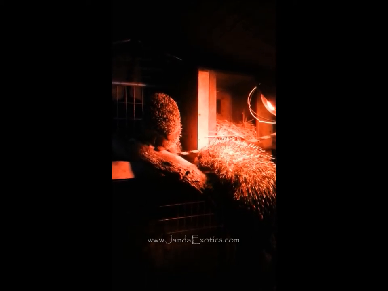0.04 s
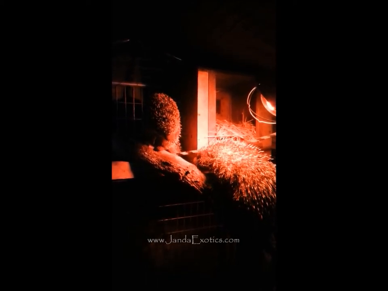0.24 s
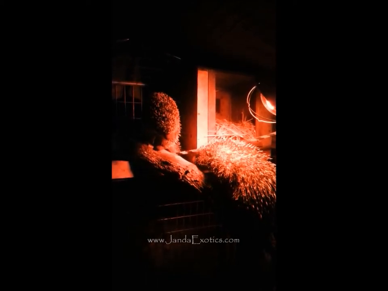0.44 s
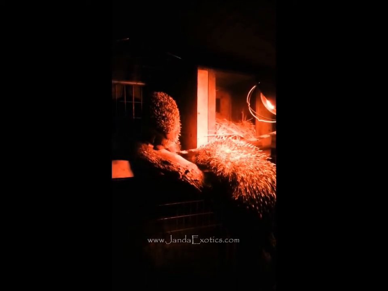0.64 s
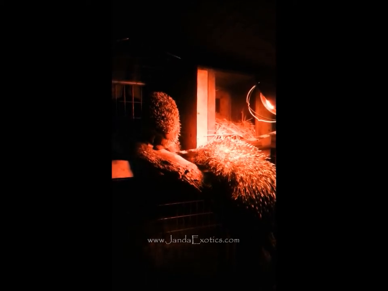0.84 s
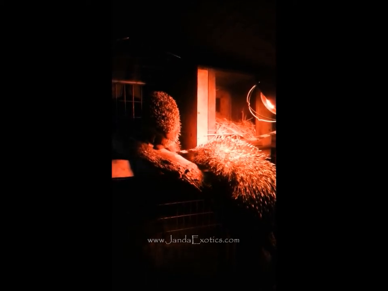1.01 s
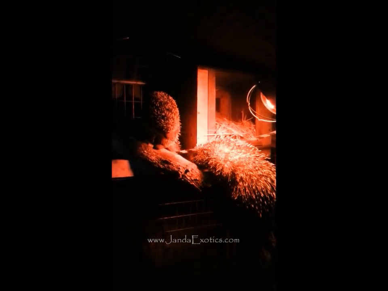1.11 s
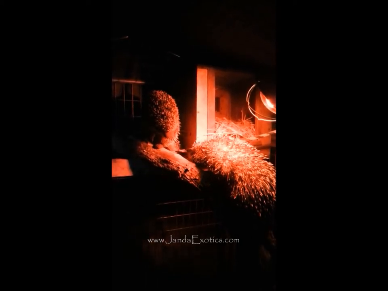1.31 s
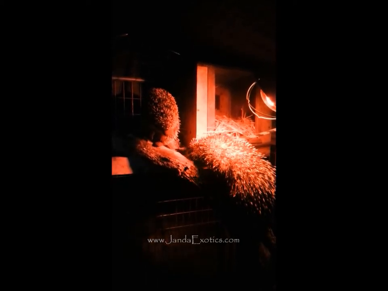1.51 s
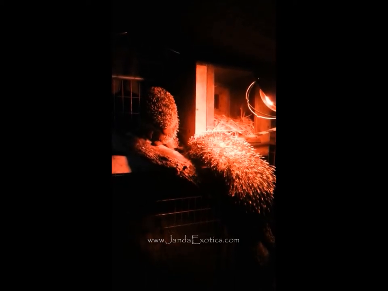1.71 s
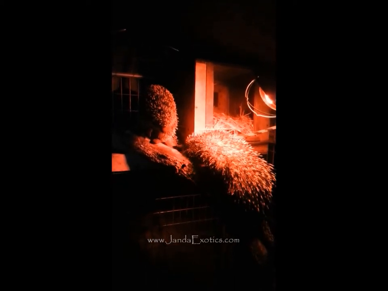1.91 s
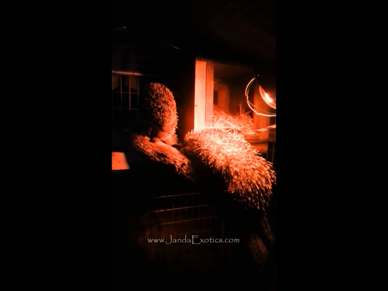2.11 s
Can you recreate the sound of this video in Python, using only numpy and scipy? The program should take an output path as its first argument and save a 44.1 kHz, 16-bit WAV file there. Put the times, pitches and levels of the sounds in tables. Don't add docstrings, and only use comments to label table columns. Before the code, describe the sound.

Harsh porcupine grunts and breathy huffs, small quill rustles, then one raspy cry and low growl.

```python
import sys
import numpy as np
from scipy import signal
from scipy.fft import rfft, irfft, next_fast_len
from scipy.io import wavfile
from scipy.ndimage import uniform_filter1d, minimum_filter1d

SR = 44100
rng = np.random.default_rng(int(sys.argv[2]) if len(sys.argv) > 2 else 0)


def master_out(mix):
    frames = np.transpose(np.atleast_2d(mix))
    ceiling = np.clip(frames, -1, 1)
    pcm = np.round(ceiling * 32767).astype(np.int16)
    wavfile.write(sys.argv[1], SR, pcm)


def invert_db(x):
    u = np.asarray(x, float) / 20
    return 10 ** u


N = 94815

GATE_RANGE_DB = 18.5


def rms_one(x):
    return x / np.sqrt(np.mean(x ** 2) + 1e-20)


def at_hz(points, hz):
    points = np.array(points)
    return np.interp(np.log(hz + 1), np.log(points[:, 0]), points[:, 1])


def drift(rate_hz, count):
    r = np.exp(-2 * np.pi * rate_hz / SR)
    settle = 9000
    noise = rng.standard_normal(count + settle)
    return rms_one(signal.lfilter([1], [1, -2 * r, r * r], noise)[settle:])


def resonate(x, hz, width_hz):
    r = np.exp(-np.pi * width_hz / SR)
    feedback = [1, -2 * r * np.cos(2 * np.pi * hz / SR), r * r]
    return signal.lfilter(np.array([1, 0, -1]) * (1 - r * r) / 2, feedback, x)


def tract(x, peaks):
    out = 0
    for k, (hz, width_hz, db) in enumerate(peaks):
        steep = resonate(resonate(x, hz, width_hz), hz, 2 * width_hz)
        out = out + (-1) ** k * invert_db(db) * steep
    return out


def background():
    # frequency in Hz, level in dB per Hz
    floor_spectrum = [(15, -54), (25, -16), (128, -6), (790, -19.5), (879, -30.5), (1240, -21.5),
                      (3350, -25.5), (13800, -26.5), (15000, -34)]
    # frequency in Hz, likeness 0-1
    likeness = [(60, 0.97), (380, 0.65), (2370, 0.1), (14800, 0.14)]
    floor_db, hum_hz, hum_db = -67.5, 117.8, -75.5
    out = 0
    edges = 22 * 2 ** np.arange(0, 9.6, .5)
    white = rng.standard_normal((2, 2, N))
    for k, (low, high) in enumerate(zip(edges, edges[1:])):
        band = signal.butter(2, [low, high], "band", fs=SR, output="sos")
        mid, side = signal.sosfilt(band, white[k % 2])
        centre = np.sqrt(low * high)
        alike = np.clip(at_hz(likeness, centre), 0, 1)
        gain = invert_db(at_hz(floor_spectrum, centre) + 0.5 * drift(18, N))
        out = out + gain * (np.sqrt(1 + alike) * mid + np.sqrt(1 - alike) * side * [[1], [-1]])
    hum = np.sin(2 * np.pi * hum_hz * np.arange(N) / SR)
    return invert_db(floor_db) * rms_one(out) + invert_db(hum_db) * hum


def thuds():
    # start in seconds, level in dB, length in seconds, centre in Hz
    thumps = [
        (0, -55, 0.028, 59.7),
        (0.252, -53.5, 0.056, 84.5),
        (1.283, -56, .03, 80.2),
        (1.533, -69, 0.04, 100.3),
        (1.69, -60, .04, 79.5),
        (1.87, -58, 0.083, 84),
    ]
    out, t = np.zeros(N + SR), np.arange(SR // 2) / SR
    for s, db, length, hz in thumps:
        push = rms_one(tract(rng.standard_normal(SR), [(hz, hz / 2, 0)])[SR // 2:])
        start = int(s * SR)
        out[start:start + len(t)] += invert_db(db) * push * np.minimum(t / 0.0069, 1) * np.exp(-(t / length) ** 2)
    return out[:N]


def rustles():
    # start in seconds, peak level in dB, length in seconds, centre in Hz, sharpness
    clumps = [(0.098, -59, 0.025, 7750, 1.3), (.24, -40, .006, 12000, 1.5), (.47, -56, .03, 4500, 1.3),
              (.577, -56, .06, 4500, 1), (.624, -40, .008, 12500, 1.5), (1.129, -64.5, .0084, 5540, 2),
              (1.25, -60.5, .04, 4490, 1.5), (1.289, -50, 0.0039, 8500, 1.3), (1.2915, -45, .003, 7200, 3),
              (1.2985, -48, .002, 9450, 1), (1.305, -60.5, 0.009, 5500, 1),
              (1.377, -53.5, 0.0062, 5300, 3.2), (1.523, -54, 0.0034, 7740, 2.5),
              (1.53, -64.5, 0.02, 5000, .7), (1.601, -70.5, .005, 7900, 1.3),
              (1.788, -44, 0.0085, 7500, .8), (2.033, -60, .004, 7350, 3), (2.096, -61, .03, 9050, 1.3),
              (2.105, -46.5, 0.0085, 6400, 2.5)]
    grains_per_s, swell_share, snap = 3300, .2, 2
    out, t = np.zeros(N + SR), np.arange(SR // 8) / SR
    for s, db, length, hz, sharpness in clumps:
        hits = rng.random(len(t)) < grains_per_s / SR
        strength = invert_db(3.2 * np.minimum(rng.exponential(1, len(t)), 2))
        grains = hits * strength * rng.choice([-1, 1], len(t))
        grains = grains + 0.21 * rng.standard_normal(len(t))
        grains = rms_one(resonate(grains, hz, hz / max(sharpness, .5)))
        swell = np.minimum(t / (swell_share * length), 1)
        decay = np.exp(-t / length) + snap * np.exp(-t / .0015) * (length < .015)
        start = int(s * SR)
        out[start:start + len(t)] += grains * invert_db(db) * swell * decay
    return out[:N]


def wheezes():
    # time in seconds, level in dB, centre in Hz
    slides = [
        [(.572, -62, 6200), (.582, -49, 6400), (.6, -47.5, 6800), (.615, -40.5, 7500), (.626, -48, 7500)],
        [(.802, -57, 5150), (.825, -37.5, 6100), (.86, -42, 6870), (.939, -50, 7440), (.975, -72, 7500)],
    ]
    width_hz, pan_db = 590, -7
    t, out = np.arange(N) / SR, 0
    for rows in slides:
        s, db, hz = np.transpose(rows)
        slow = [drift(width_hz, N) for _ in range(4)]
        turn = 2 * np.pi * np.cumsum(np.interp(t, s, hz)) / SR
        both = np.array([slow[k] * np.cos(turn) + slow[k + 2] * np.sin(turn) for k in (0, 1)])
        out = out + both * invert_db(np.interp(t, s, db, -200, -200) + pan_db * np.array([[.5], [-.5]]))
    return out


def hums():
    # time in seconds, pitch in Hz, level in dB
    nasal = [
        [(0.628, 704, -49), (0.632, 705, -40.5), (0.652, 706, -44.5), (0.664, 668, -52.5), (0.682, 670, -48),
         (0.7, 707, -64.5)],
        [(0.735, 784, -63), (0.745, 776, -48), (0.753, 741, -48), (0.763, 736, -49.5), (0.801, 771, -45),
         (0.818, 806, -53)],
    ]
    # time in seconds, pitch in Hz, level in dB
    chest = [
        [(0.86, 175, -57), (0.872, 174, -57.5), (0.94, 154.8, -62), (0.96, 153, -65)],
        [(1.83, 175, -64), (1.862, 175.7, -49), (1.88, 173.3, -52), (1.99, 142.9, -64)],
    ]
    out, t = np.zeros(N), np.arange(N) / SR
    for rows in nasal + chest:
        s, hz, db = np.transpose(rows)
        fade = np.clip(np.minimum(t - s[0], s[-1] - t) / .005, 0, 1)
        level = invert_db(np.interp(t, s, db) + 3.0 + 1.5 * drift(60, N))
        out += fade * level * np.sin(2 * np.pi * np.cumsum(np.interp(t, s, hz)) / SR)
    return out


def voice():
    # time in seconds, level in dB, fold rate in Hz, roughness 0-1, weakening of every other pulse 0-1
    grunts = [
        [(0, -44.5, 357, 1, 0.54), (.04, -51.5, 333, .8, 0.05), (.065, -67.5, 326, 1.1, 0.65),
         (.085, -85, 300, 1.1, 0.8)],
        [(.628, -58.5, 357, 0.5, .1), (.636, -24, 346.5, 0.8, 0.85), (.685, -49, 329.2, .7, 0),
         (.7, -37.5, 326, 0.8, 0.5), (.742, -38, 346, 0.6, 0)],
        [(.743, -46, 364.7, 0.3, 0.2), (.79, -35.5, 388.2, 0.7, 0.37), (.806, -45, 383, 0.8, 0),
         (.822, -35, 361, 0.6, 0.4), (.86, -46.5, 337.6, 0.6, 0.71), (.93, -46.5, 333.7, 0.7, 0.7),
         (.96, -58.5, 300, 1, .8), (.985, -95, 288.5, 1.1, 0.77)],
    ]
    cry = [
        [(1.668, -62, 411.3, 0.3, 0.2), (1.673, -30.5, 408.9, 0.24, 0), (1.698, -28.5, 400.9, .2, 0.37),
         (1.712, -27, 375.4, .25, 0.22), (1.72, -30, 352, .35, 0.6), (1.742, -28, 346.1, .4, 0.48),
         (1.758, -37, 343, 0.65, 0.6), (1.79, -49.5, 363, 0.73, 0.6), (1.812, -58, 370, 1.1, 0.5)],
        [(1.813, -47.5, 348.4, 0.4, 0.2), (1.835, -41, 353, 0.48, 0.5), (1.86, -39.5, 367, 0.08, 0.65),
         (1.89, -42.5, 354.7, 0.51, 0.54), (1.918, -46, 307, 0.96, 0.2), (1.936, -46.5, 331, 0.53, 0.25),
         (1.968, -46.5, 284.7, 1, 0), (1.99, -59.5, 295, .9, 0.55), (2.01, -64, 296, 0.47, 0.8)],
    ]
    # nasal hum, four low resonances, seventh resonance, top two resonances, all in
    # dB
    colour = [(-38, 0.5, -1.5, 1.5), (-38, 3, -.5, 7.5), (-40, 0, -7.5, -11.5), (-24, 1, -0.5, 0.5),
              (-20, 0, 5, 6)]
    # resonance in Hz, width in Hz, level in dB
    throat = [(230, 300, -22.5), (708, 250, -15), (1300, 300, -14), (2410, 1400, -16.5), (3508, 150, -4),
              (3938, 240, 1), (5173, 430, -3), (7010, 1100, -8.5), (9400, 1300, -33)]
    # resonance in Hz, width in Hz,
    # level in dB
    cry_throat = [(400, 150, -19), (807, 210, -19), (1380, 200, -15), (2500, 1000, -17), (3580, 335, -3),
                  (4050, 400, 1), (5150, 450, -9), (6950, 510, -10), (9800, 1300, -30)]
    jitter, shimmer_db, pulse_sharpness = .05, 1.5, 300
    throats = [throat] * len(grunts) + [cry_throat] * len(cry)
    out = np.zeros(N)
    for rows, (hum_db, low_db, seventh_db, top_db), shape in zip(grunts + cry, colour, throats):
        s, *columns = np.transpose(rows)
        at = np.arange(int(s[0] * SR), int(s[-1] * SR))
        chance = rng.standard_normal(200)
        wobble = drift(120, SR // 2)[:len(at)]
        breath = rng.standard_normal(len(at))
        db, hz, rough, weak = [np.interp(at / SR, s, c) for c in columns]
        rough, weak = np.clip(rough, 0, 1), np.clip(weak, 0, 1)

        turns = np.cumsum(hz * (1 + jitter * rough ** 2 * wobble)) / SR
        cycle = np.round(turns).astype(int)
        bend = np.cos(2 * np.pi * turns) - 1
        size = (1 - weak * (cycle % 2)) * invert_db(shimmer_db * rough * chance[cycle])
        pulses = rms_one(np.exp(pulse_sharpness * bend))
        gated_breath = breath * rms_one(np.exp(0.56 * bend))
        source = size * ((1 - rough) ** 2 * pulses + rough * gated_breath)

        lift = [low_db] * 4 + [0, 0, seventh_db, top_db, top_db]
        peaks = [(f, width, level + up) for (f, width, level), up in zip(shape, lift)]
        hum = invert_db(hum_db) * (1 - weak) ** 3 * np.sin(4 * np.pi * turns)
        out[at] += invert_db(db) * (rms_one(tract(source, peaks)) + hum)
    return out


def huffs():
    # start in seconds, attack in seconds, hold in seconds, level in dB
    bursts = [
        (0.2386, .004, 0.034, -14.5),
        (0.6218, 0.012, 0.021, -15),
    ]
    # resonance in Hz, width in Hz, level in dB
    mouths = [
        [(750, 250, -18.5), (1490, 300, -17.5), (2040, 560, -26), (3164, 340, -6), (3546, 290, -1),
         (3864, 290, 1), (4680, 380, -10), (5140, 300, -5), (6060, 900, -15), (7440, 950, -8.5),
         (10500, 2500, -29.5)],
        [(677, 190, -15.5), (1300, 270, -17), (2100, 1100, -22), (3250, 340, -2), (3640, 200, -5.5),
         (3920, 300, -2), (4567, 270, -2), (4900, 350, -3), (5500, 550, -9), (6970, 1400, -12),
         (10490, 2500, -33)],
    ]
    fall_db_per_s = 699
    out, t = np.zeros(N), np.arange(SR // 4) / SR
    for (s, attack, hold, db), mouth in zip(bursts, mouths):
        air = rng.standard_normal(len(t)) * invert_db(2.0 * drift(150, len(t)))
        air = rms_one(tract(air, mouth))
        shape = np.minimum(t / attack, 1) * invert_db(db - fall_db_per_s * np.maximum(t - hold, 0))
        start = int(s * SR)
        out[start:start + len(t)] += air * shape
    return out


def shelter(x, room_db):
    # frequency in Hz, left over right in dB
    port_balance = [(60, 0.5), (500, 8.5), (1500, 9), (3800, 13.5), (5400, 10.5), (7200, -11), (10000, 0.5),
                    (14000, 1.5)]
    # frequency in Hz, left lead in radians
    port_phase = [(0, 0), (3880, -8), (5940, -19.5), (8700, -13.5), (10600, -30.5), (13400, 3),
                  (15000, -15.5)]
    t60_s, gap_s = 0.22, 0.0027
    size = next_fast_len(N + SR // 2)
    hz, t = np.arange(size // 2 + 1) * SR / size, np.arange(SR // 2) / SR
    tail = rng.standard_normal((2, len(t))) * invert_db(-60 * t / t60_s) * (t > gap_s)
    tail = invert_db(room_db) * tail / np.sqrt(np.sum(tail ** 2, axis=1)[:, None])
    side = np.array([[.5], [-.5]])
    ports = invert_db(side * at_hz(port_balance, hz)) * np.exp(1j * side * at_hz(port_phase, hz))
    return irfft(rfft(x, size) * (ports + rfft(tail, size)), size)[:, :N]


def gate(x):
    shut_db, open_db, lag_s = -70, -40.5, .008
    db = 10 * np.log10(uniform_filter1d(np.mean(x ** 2, axis=0), 900).clip(1e-12))
    opening = np.clip((db - shut_db) / (open_db - shut_db), 0, 1)
    r = np.exp(-1 / (lag_s * SR))
    lagged = signal.lfilter([1 - r], [1, -r], opening, zi=[r * opening[0]])[0]
    return invert_db(GATE_RANGE_DB * lagged)


def scene():
    near = wheezes() + shelter(voice() + hums() + rustles(), -7) + shelter(huffs(), -4)
    gain, floor = gate(near), background()
    rumble = signal.sosfiltfilt(signal.butter(2, 200, fs=SR, output="sos"), floor)
    trimmed = near * (gain / invert_db(GATE_RANGE_DB)) ** 0.38
    return trimmed + gain * (floor - rumble) + gain ** .75 * rumble + thuds()


def starve(x):
    from_hz, band_hz, ragged_db = 7400, 220, 6
    below_db, tilt_db_per_khz = 32.5, 3.5
    hz, _, spectra = signal.stft(x, SR, nperseg=1024)
    band = (hz // band_hz).astype(int)
    starts = np.flatnonzero(np.diff(band, prepend=-1))
    db = 10 * np.log10(np.add.reduceat(np.abs(spectra) ** 2, starts, axis=1) + 1e-20)
    loudest = minimum_filter1d(db.max(axis=(0, 1), keepdims=True), size=2)
    db = db + ragged_db * rms_one(uniform_filter1d(rng.standard_normal(db.shape), size=5))
    over = db[:, band] - loudest + below_db - tilt_db_per_khz * (hz[:, None] / 1000 - 10)
    keep = np.where(hz[:, None] > from_hz, over > 0, 1)
    return signal.istft(spectra * keep, SR, nperseg=1024)[1][:, :N]


def low_pass(x):
    return signal.sosfilt(signal.butter(12, 15450, fs=SR, output="sos"), x)


def record(dry):
    limited = np.clip(dry, -.92, .92)
    top_cut = signal.cheby2(10, 50, 15600, fs=SR, output="sos")
    mix = signal.sosfilt(top_cut, starve(limited))
    return low_pass(mix)


dry = scene()
out = record(dry)
master_out(out)
```